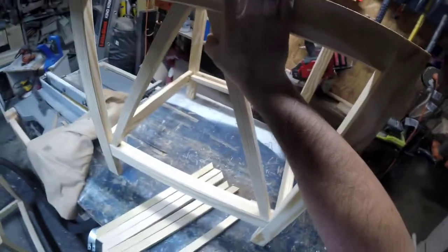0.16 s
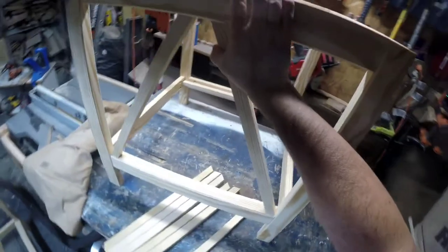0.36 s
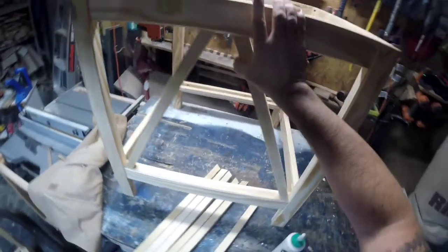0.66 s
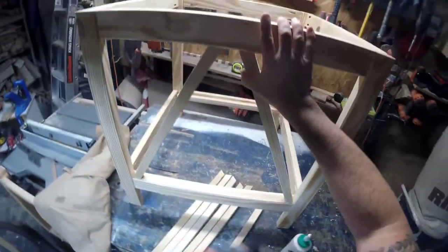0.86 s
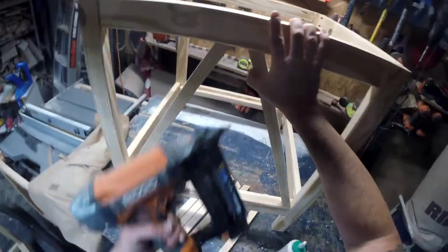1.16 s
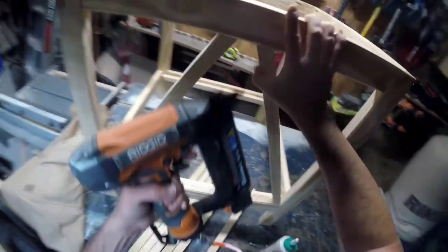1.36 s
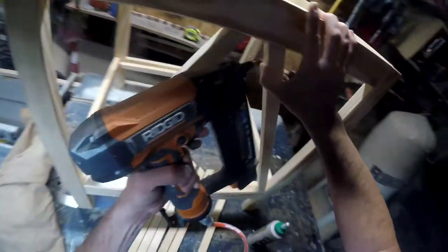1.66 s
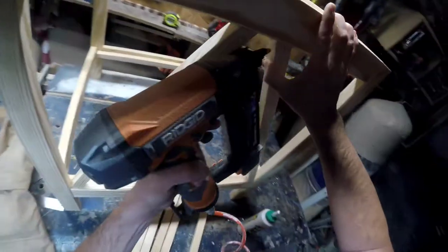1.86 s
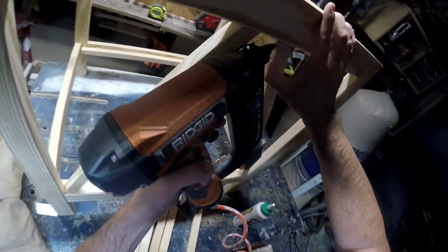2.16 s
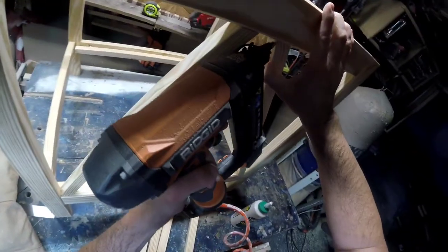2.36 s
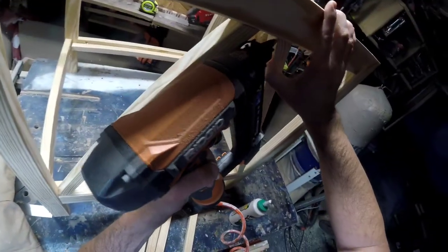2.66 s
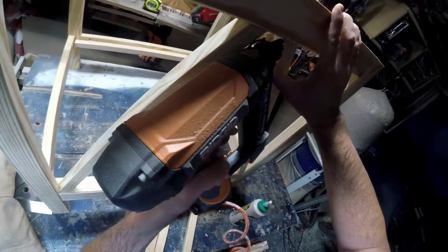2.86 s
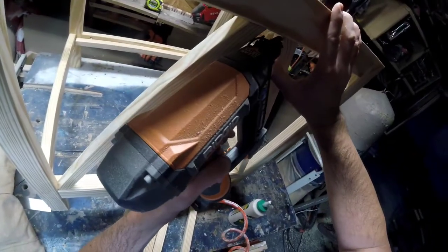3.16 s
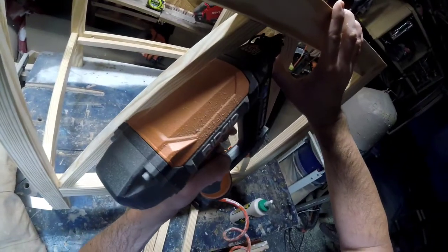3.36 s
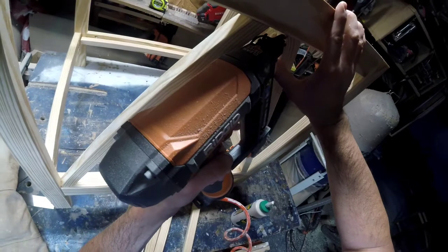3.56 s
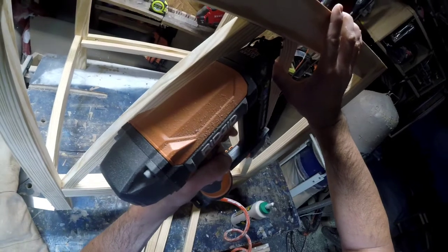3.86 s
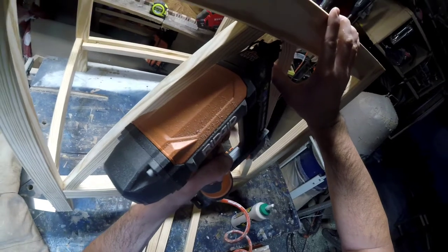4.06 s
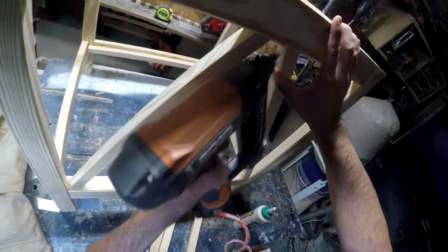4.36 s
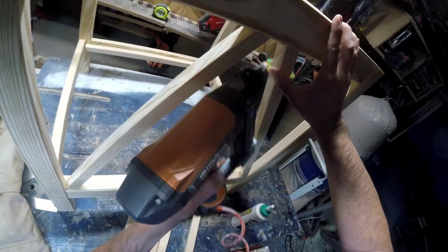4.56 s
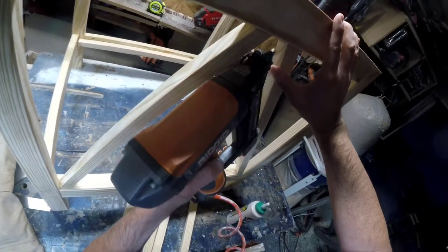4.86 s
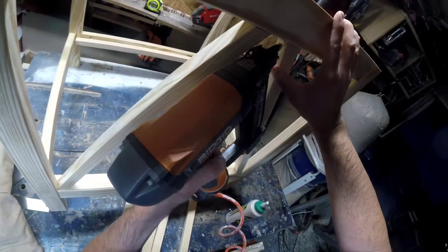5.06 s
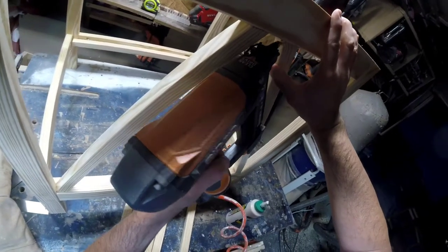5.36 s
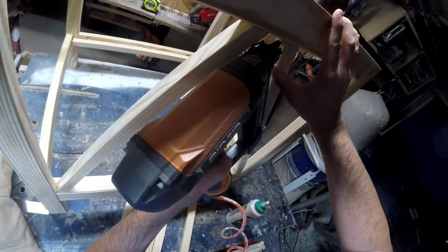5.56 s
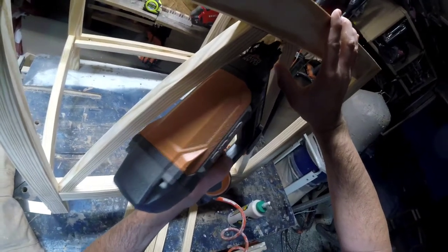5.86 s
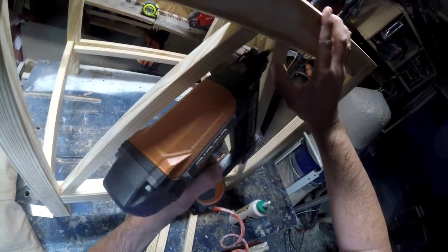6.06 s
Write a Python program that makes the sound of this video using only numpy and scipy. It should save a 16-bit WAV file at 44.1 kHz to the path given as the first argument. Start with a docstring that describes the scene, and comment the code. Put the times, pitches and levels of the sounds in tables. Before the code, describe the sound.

A pneumatic nail gun is lined up on wood and fires once with a crack and puff of air, over low workshop hum.

```python
"""Soft rubbing and light clicks come first, close by in a small workshop: a wooden frame is shifted and
the nose of a pneumatic nailer touches it. Then one brad is fired: the valve spits, the driver's impact
rings the metal housing and the frame, and a turbulent exhaust jet excites the resonances of its cap.
A gain control ducks under the shot and creeps back while the tool is set down on the next spot.
Room noise hums underneath, and the sound drops out for an instant near the end."""
import sys
import numpy as np
from scipy import signal
from scipy.fft import rfft, irfft, next_fast_len
from scipy.io import wavfile
from scipy.ndimage import uniform_filter1d, map_coordinates

SR = 44100
rng = np.random.default_rng(int(sys.argv[2]) if len(sys.argv) > 2 else 0)


def to_wav(sig):
    """Store sig (one row per channel, or 1-D mono) as 16-bit WAV at the path in sys.argv[1].

    Samples outside -1..1 are clipped; the rate is SR.
    """
    pcm = np.clip(np.atleast_2d(sig), -1, 1) * 32767
    pcm = np.round(pcm).astype(np.int16)
    wavfile.write(sys.argv[1], SR, pcm.T)  # frames by channels


N = 273420
TIME = np.arange(N) / SR

# the driver hitting home and the piston returning: start_s, crack_db, wood_db, thump_db, t60_s
BLOWS = [(4.0672, -26.5, -36.5, -21, .023), (4.0911, -32.5, -32.5, -20.5, .02), (4.099, -0.5, 3, 0, 0.024),
         (4.2322, -25, -20.5, -16, .02), (4.2448, -24.5, -8.5, -6, .035), (4.2563, -10.5, -15, -4, 0.054),
         (4.275, -27, -14.5, -16, .06)]
# spectra of a hard contact and of a heavy blow on wood: frequency_hz, level_db
CRACK_SPECTRUM = [(2500, -26), (4300, -18), (5500, -2), (7500, 5), (9800, -1.5), (11400, -24), (15500, -31)]
WOOD_SPECTRUM = [(150, -2), (430, 8.5), (580, -3.5), (750, -1), (1150, -1.5), (1400, -3.5), (1800, -5.5),
                 (2600, -7), (3400, -9.5), (4500, -20.5), (9000, -25.5), (15000, -27)]
# modes of the tool's metal body and of the wooden frame: pitch_hz, level_db, t60_s
HOUSING_MODES = [(1132, -15, 0.35), (2100, -11, 0.34), (2460, -3.5, 0.14), (3000, -10.5, 0.28),
                 (5545, -20.5, 0.45), (5660, -13, 0.12), (6740, -7.5, 0.19), (6560, 3, 0.21),
                 (7800, -10, 0.23), (7500, -15, 0.37), (8823, -9.5, 0.19), (10100, -20.5, 0.24),
                 (9700, -16, 0.15)]
FRAME_MODES = [(169.4, -6, 0.18), (188, -7.5, 0.15), (218.5, 1, .17), (266, -4, 0.12), (311, -9, .1),
               (385.4, -7.5, 0.14), (523, -11.5, 0.05)]
def driver_blows():
    """Impact excitation: each blow radiates a broadband crack and sets housing and frame ringing."""
    crack, wood, out = noise(CRACK_SPECTRUM), noise(WOOD_SPECTRUM), np.zeros(N)
    for start_s, crack_db, wood_db, thump_db, t60_s in BLOWS:
        out += amp(wood_db) * wood * burst(start_s, 0.0015, 0.0012, t60_s)
        out += amp(crack_db) * crack * burst(start_s, 0.0025, 0.0015, t60_s)
        rattle = 0.5 + 1.1 * wobble(220)  # loose parts roughen the ring
        out += amp(crack_db - 23) * rattle * ring(start_s, HOUSING_MODES, scatter_db=1)
        push = ring(start_s, [(226, 0.0031, 0.015)], scatter_db=-1.5)
        frame = amp(-5.5) * ring(start_s, FRAME_MODES, scatter_db=-1)
        out -= amp(thump_db) * (push + frame)
    return out


# air let out by the tool: start_s, hiss_db, cap_db, hold_s, t60_s
AIR_JETS = [(4.065, -17.5, -29.5, 0.0011, .02), (4.068, -18.5, -36.5, .04, .03),
            (4.224, -17, -20, 0.0033, .034), (4.245, -5, -0.5, 0.01, .048), (4.258, -20, -21.5, .006, .35)]
# spectrum of rushing air: frequency_hz, level_db
JET_SPECTRUM = [(450, -17.5), (700, -24), (1350, -13.5), (2000, -11), (2700, -6.5), (4200, -17),
                (5500, -3.5), (7500, -2.5), (10000, 0.5), (10900, -8.5), (11600, -16.5), (14500, -24),
                (15600, -28)]
# resonances of the exhaust cap: pitch_hz, width_hz, level_db
CAP_RESONANCES = [(5300, 360, -8), (6600, 340, -3), (6930, 470, -1), (7640, 400, 4.5), (8700, 500, -7)]
# modes of the firing valve: pitch_hz, level_db, t60_s
VALVE_MODES = [(1760, -8.5, 0.066), (2290, -0.5, 0.087), (2493, -9, .05), (3496, -3, 0.041),
               (5580, -2.5, 0.044), (9000, -0.5, 0.036), (10000, -1, .04)]
def valve_and_exhaust():
    """Jet noise: the valve clacks open and turbulent air excites the cap until the cylinder is empty."""
    hiss, cap, jet = noise(JET_SPECTRUM), resonant(CAP_RESONANCES), np.zeros(N)
    for start_s, hiss_db, cap_db, hold_s, t60_s in AIR_JETS:
        flow = burst(start_s, rise_s=0.0048, hold_s=hold_s, t60_s=t60_s)
        jet += flow * (amp(hiss_db) * hiss + amp(cap_db) * cap)
    emptying = np.interp(TIME, [4.36, 4.45], [1, 0])
    clack = amp(-23) * ring(4.0675, VALVE_MODES, scatter_db=0.5)
    return jet * emptying * amp(0.59 * wobble(300)) + clack


# the nose and safety tip touching the frame: start_s, steel_db, wood_db, steel_hz, wood_hz
CLICKS = [(0.977, -49.5, -47.5, 7213, 2350), (1.901, -46, -53, 6470, 3230),
          (2.0088, -39.5, -44, 5180, 1720), (2.119, -50, -49.5, 5200, 2400), (2.277, -35, -33, 9040, 898),
          (2.569, -44.5, -49, 6860, 2380), (2.6476, -27.5, -45, 8280, 2930),
          (3.923, -48.5, -41.5, 8100, 940), (4.043, -41.5, -53, 8650, 2300),
          (4.619, -27, -30.5, 8500, 2600), (4.8625, -27.5, -32.5, 8420, 2330),
          (5.051, -23, -32.5, 7990, 2555), (5.295, -49.5, -45.5, 5480, 2000), (5.886, -36, -52, 7500, 2530),
          (5.89, -23.5, -23, 5600, 2900), (5.9621, -22.5, -30.5, 8540, 2200),
          (6.162, -42.5, -43, 6740, 1400)]
# spectrum of a light tap on wood: frequency_hz, level_db
TAP_SPECTRUM = [(300, -27), (650, -9), (1000, 0), (1600, -4), (2400, 0.5), (3200, -6), (4400, -16),
                (9000, -32.5)]
# modes of the rail the nose settles on: pitch_hz, level_db, t60_s
RAIL_MODES = [(922, -3, .06), (1160, -6, .04)]
def nose_clicks(steel_t60_s=0.026, wood_t60_s=0.023):
    """Damped free vibration: steel and wood ring briefly at each contact, then the nose settles."""
    crack, tap, out = noise(CRACK_SPECTRUM), noise(TAP_SPECTRUM), np.zeros(N)
    for start_s, steel_db, wood_db, steel_hz, wood_hz in CLICKS + stray_ticks():
        steel_modes = [(steel_hz, 0, steel_t60_s), (1.07 * steel_hz, -3, 0.53 * steel_t60_s),
                       (0.95 * steel_hz, -5, 0.64 * steel_t60_s)]
        wood_modes = [(wood_hz, 0, wood_t60_s), (0.77 * wood_hz, -5, wood_t60_s)]
        steel = amp(-6) * ring(start_s + 0.00033, steel_modes, scatter_db=0.5)
        wood = amp(-3) * ring(start_s + 0.0006, wood_modes, scatter_db=2)
        tick = amp(-3.5) * crack * burst(start_s, 0.00033, 0.00048, 0.021)
        knock = amp(-2) * tap * burst(start_s, 0.0012, 0.00025, 0.028)
        thud = amp(-27) * ring(start_s, FRAME_MODES, scatter_db=2)
        out += amp(steel_db) * (tick + steel) + amp(wood_db) * (knock + wood + thud)
        settle_s = start_s + 0.008  # a second, softer touch
        touch = (tap + amp(-2.5) * crack) * burst(settle_s, 0.001, 0.0005, 0.03)
        rail = amp(-1.5) * ring(settle_s, RAIL_MODES, scatter_db=1.5)
        out += amp(wood_db - 11.5) * (touch + rail)
    return out


def stray_ticks(from_s=1.4, to_s=4, ticks_per_s=2.5, level_db=-53.5, steel_hz=6300, wood_hz=2670):
    """A random point process: faint contacts while the tool is lined up, as rows like those of CLICKS."""
    count, ticks = round(ticks_per_s * (to_s - from_s)), []
    for when, force, spot in rng.random((count, 3)):
        start_s = from_s + when * (to_s - from_s)
        detune = 0.85 + 0.3 * spot
        ticks.append((start_s, level_db + 6 * force, level_db, steel_hz * detune, wood_hz * detune))
    return ticks


# tool and hand bumping the frame: start_s, level_db
BUMPS = [(.688, -44), (1.745, -42.5), (4.044, -47.5), (4.8627, -36), (5.294, -43.5), (6.161, -46.5)]
def frame_bumps():
    """A soft contact carries little treble, so it excites only the frame's low modes."""
    return sum(amp(level_db) * ring(start_s, FRAME_MODES, scatter_db=2.5) for start_s, level_db in BUMPS)


# hand, hose and frame sliding: peak_s, hiss_db, scrape_db, scrape_hz, rise_s, fall_s
RUBS = [(.105, -41.5, -49.5, 2120, 0.037, 0.021), (.27, -50.5, -51.5, 1270, 0.019, 0.043),
        (.7, -53.5, -47, 895, 0.025, 0.047), (.855, -47.5, -46.5, 1300, 0.031, 0.04),
        (1.0, -63, -53, 1000, 0.019, 0.027), (1.318, -37.5, -41, 1420, 0.01, 0.033),
        (1.8, -58.5, -63, 2500, 0.038, 0.096)]
# spectra of sliding skin and rubber, and of sliding wood: frequency_hz, level_db
SKIN_SPECTRUM = [(2350, -39), (4000, -16), (4430, -21), (5640, -7), (7300, -0.5), (10100, -11),
                 (11400, -28), (14500, -31), (15400, -38), (15700, -48)]
SCRAPE_SPECTRUM = [(200, -2), (500, -1.5), (900, 2), (1600, 1), (2500, -4), (3500, -11), (4500, -32)]
def rubs():
    """Friction noise follows sliding speed; each stroke has a broad resonance, roughened by the grain."""
    hiss, scrape, out = noise(SKIN_SPECTRUM), noise(SCRAPE_SPECTRUM), np.zeros(N)
    for peak_s, hiss_db, scrape_db, scrape_hz, rise_s, fall_s in RUBS:
        width_s = np.where(TIME < peak_s, rise_s, fall_s)
        speed = np.exp(-0.5 * ((TIME - peak_s) / width_s) ** 2)
        body = 0.79 * scrape + 0.65 * resonant([(scrape_hz, 0.38 * scrape_hz, 0)])
        out += speed * (amp(hiss_db) * hiss + amp(scrape_db) * body)
    grain = amp(1.19 * wobble(120))
    return out * grain


# the grip shifting on the frame: start_s, level_db, t60_s
GRIP_SHIFTS = [(1.735, -46.5, 0.64), (5.29, -51, 0.84), (5.53, -55, 1.2)]
def handling(held_still_s=1.6):
    """Incoherent noises add in power: dull shuffling, fainter once the frame is held, and grip shifts."""
    steady = amp(np.interp(TIME, [held_still_s - 0.2, held_still_s], [-54.5, -58.5]))
    shifts = sum(amp(level_db) * burst(start_s, rise_s=0.024, hold_s=0, t60_s=t60_s)
                 for start_s, level_db, t60_s in GRIP_SHIFTS)
    shuffle = noise([(90, -39.5), (160, -1), (300, 1.5), (600, -5.5), (1500, -13.5),
                     (3000, -17.5), (4500, -37), (8000, -19), (14000, -41)])
    return np.hypot(steady, shifts) * amp(3.5 * wobble(45)) * shuffle


# reverberation time of the workshop: frequency_hz, t60_s
ROOM_DECAY = [(150, 0.23), (1000, 0.33), (3000, 0.29), (8000, 0.21), (15000, 0.2)]
def reverberation(x, build_up_s=0.0059):
    """Convolution with a diffuse tail: reflections from bench and walls decay at a rate set by frequency."""
    hz, t, spectrum = signal.stft(rng.standard_normal(SR // 2), SR, nperseg=256)
    decay = amp(-60 * t / along(ROOM_DECAY, hz)[:, None])
    tail = signal.istft(spectrum * decay, SR)[1]
    tail *= np.clip(np.arange(len(tail)) / SR / build_up_s, 0, 1)
    return signal.fftconvolve(x, tail / np.linalg.norm(tail))[:N]


# spectrum of the steady room noise: frequency_hz, level_db
ROOM_SPECTRUM = [(53, -66), (90, -30.5), (102, -38.5), (127, -2.5), (151, 2), (289, -6), (322, -7.5),
                 (391, -9.5), (553, -12.5), (1700, -19.5), (4400, -38), (6780, -25), (8780, -26),
                 (14800, -40), (15700, -44.5)]
# the room's low resonance: pitch_hz, width_hz, level_db
ROOM_RESONANCE = [(173, 130, 0)]
def room_noise():
    """Stationary noise fills the workshop, and a low room resonance adds a wavering drone."""
    steady = amp(-51) * noise(ROOM_SPECTRUM)
    drone = amp(-60) * resonant(ROOM_RESONANCE) * amp(1.1 * wobble(12))
    return steady + drone


def amp(level_db):
    """Decibels to amplitude ratio."""
    return 10 ** (np.asarray(level_db) / 20)


def unit(x):
    """Normalisation to rms 1."""
    return x / np.sqrt(np.mean(x ** 2) + 1e-20)


def along(points, hz):
    """Interpolation of (frequency_hz, value) points on a logarithmic frequency axis."""
    frequencies, values = np.transpose(points)
    return np.interp(np.log(hz + 1), np.log(frequencies + 1), values)


def filtered(x, response):
    """Linear filtering: the spectrum of x times a frequency response."""
    size = next_fast_len(N + SR // 2)
    return irfft(rfft(x, size) * response(np.fft.rfftfreq(size, 1 / SR)), size)[:N]


def noise(spectrum):
    """Spectral shaping: noise of rms 1 coloured by (frequency_hz, level_db) points."""
    return unit(filtered(rng.standard_normal(N), lambda hz: amp(along(spectrum, hz))))


def resonant(peaks):
    """Forced resonance: noise through squared band-pass responses, scaled to rms 1."""
    def response(hz):
        return sum(amp(level_db) * np.abs(hz * width_hz / (pitch_hz**2 - hz**2 + 1j * hz * width_hz)) ** 2
                   for pitch_hz, width_hz, level_db in peaks)
    return unit(filtered(rng.standard_normal(N), response))


def wobble(rate_hz):
    """Random modulation: a smooth curve through rate_hz random values a second."""
    return map_coordinates(rng.standard_normal(int(N * rate_hz / SR) + 4), [TIME * rate_hz])


def burst(start_s, rise_s, hold_s, t60_s):
    """A transient's envelope: linear rise, hold, exponential decay."""
    attack = np.clip((TIME - start_s) / rise_s, 0, 1)
    return attack * amp(-60 * np.clip((TIME - start_s - rise_s - hold_s) / t60_s, 0, 3))


def ring(start_s, modes, scatter_db):
    """Modal superposition: damped sines whose strengths vary at random from blow to blow."""
    t = np.arange(SR // 2) / SR
    tone = np.zeros_like(t)
    for pitch_hz, level_db, t60_s in modes:
        struck_db = level_db + scatter_db * rng.standard_normal()
        tone += amp(struck_db - 60 * t / t60_s) * np.sin(2 * np.pi * pitch_hz * t)
    return np.pad(tone, (round(start_s * SR), N))[:N]


def scene():
    """Superposition: shot and contacts with their reverberation, over rubbing and room noise."""
    jets, blows = valve_and_exhaust(), driver_blows()
    contacts = nose_clicks() + frame_bumps()
    echo = amp(-14) * (reverberation(jets) + reverberation(blows)) + amp(-15.5) * reverberation(contacts)
    return (jets + blows + contacts + echo + rubs() + handling() + room_noise())[None]


def gain_control(x, ceiling_db, recovery_db_per_s):
    """Limiting: the gain drops at once when the level passes the ceiling, then recovers steadily."""
    level_db = 10 * np.log10(np.abs(uniform_filter1d(x ** 2, size=220)) + 1e-12)
    excess_db = np.maximum(level_db - ceiling_db, 0)
    recovery_db = recovery_db_per_s * TIME
    cut_db = np.maximum.accumulate(excess_db + recovery_db) - recovery_db
    return x * amp(-cut_db)


def record(dry, silence_from_s=6.055, silence_to_s=6.070, top_hz=15600):
    """Band and amplitude limiting, with a faint rumble and a brief drop to silence."""
    bass_cut = signal.ellip(5, 0.5, 35, 139, "highpass", fs=SR, output="sos")
    x = signal.sosfilt(bass_cut, dry[0])
    x = gain_control(x, ceiling_db=-8, recovery_db_per_s=9)
    x = x / (1 + np.abs(x) ** 6) ** (1 / 6)  # soft clipping
    rumble_gain = amp(-72.5 + 1.3 * wobble(2.4))
    x += rumble_gain * noise([(20, -1.5), (45, -3), (90, -9.5), (200, -30), (1000, -71)])
    fade_in = np.clip((TIME - silence_to_s) / 0.018, 0, 1)
    x *= np.where(TIME < silence_from_s, 1, fade_in)
    return filtered(x, lambda hz: hz < top_hz)[None]


dry = scene()
out = record(dry)
to_wav(out)
```